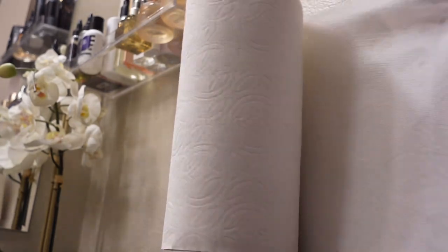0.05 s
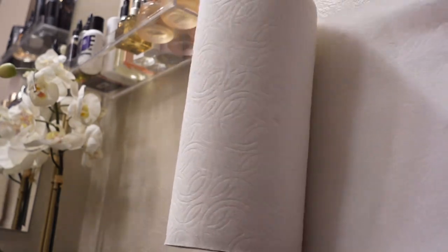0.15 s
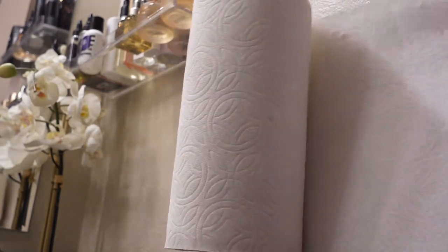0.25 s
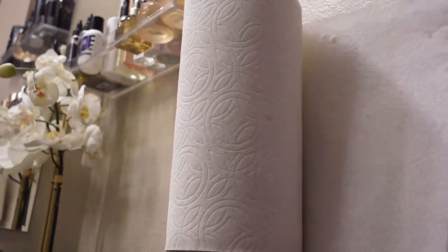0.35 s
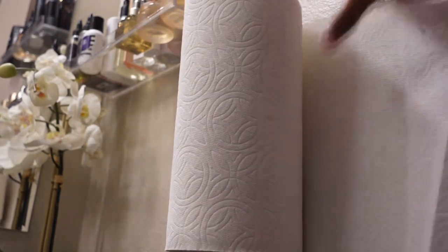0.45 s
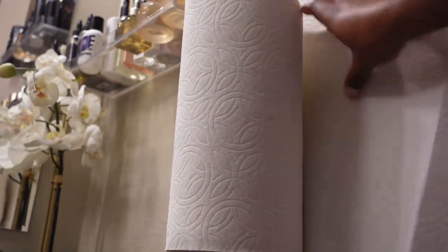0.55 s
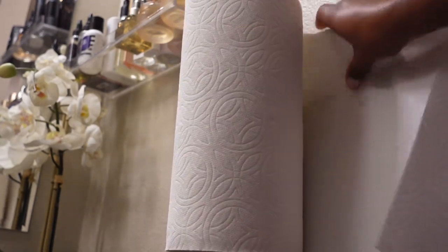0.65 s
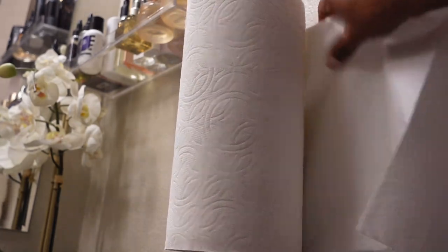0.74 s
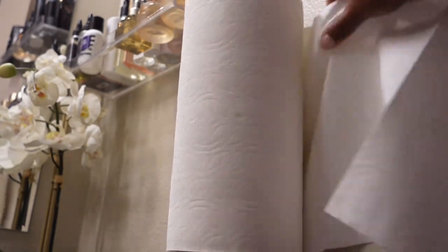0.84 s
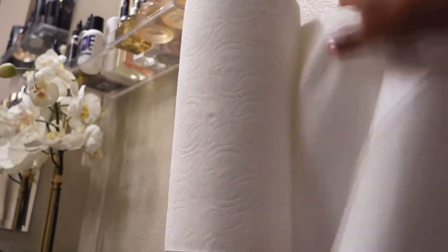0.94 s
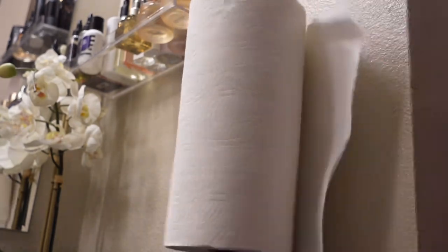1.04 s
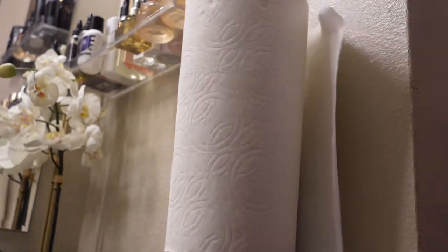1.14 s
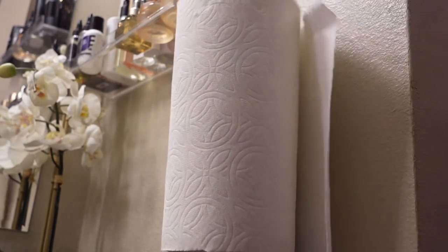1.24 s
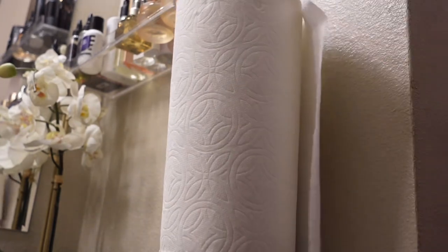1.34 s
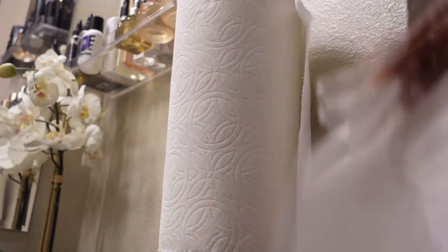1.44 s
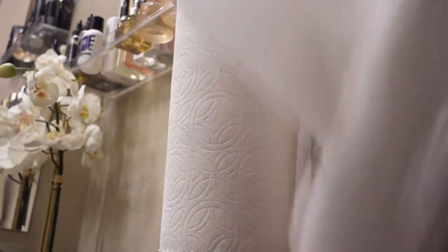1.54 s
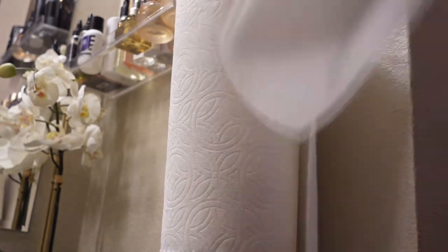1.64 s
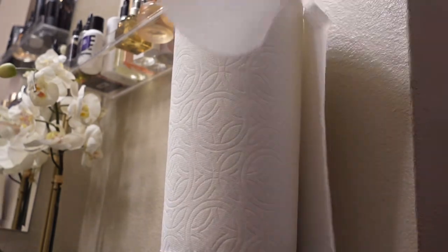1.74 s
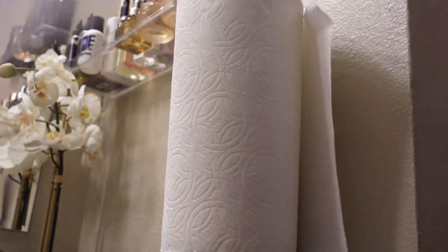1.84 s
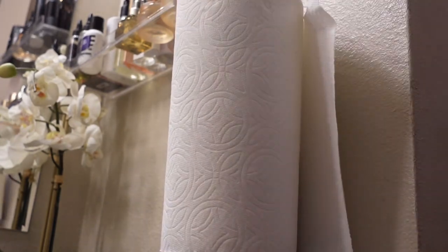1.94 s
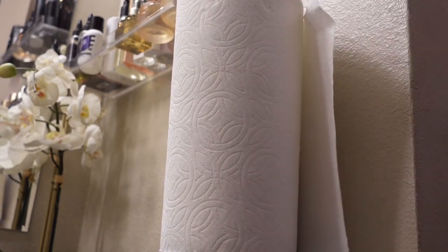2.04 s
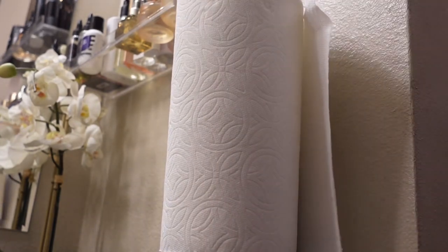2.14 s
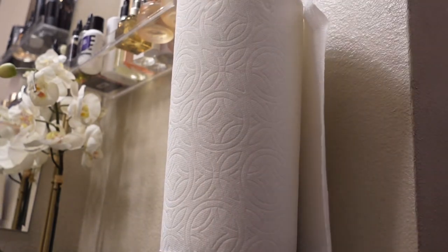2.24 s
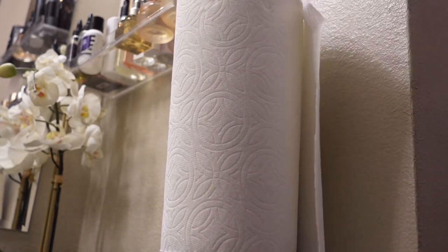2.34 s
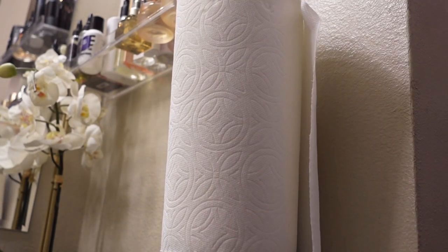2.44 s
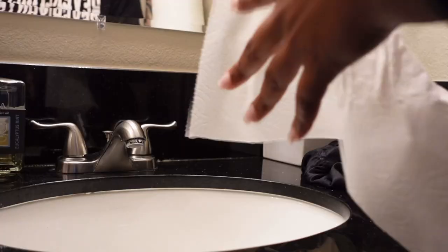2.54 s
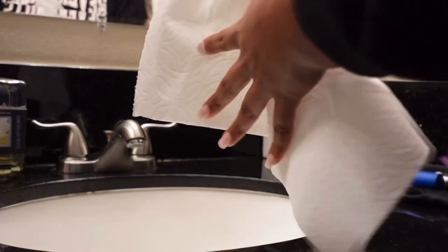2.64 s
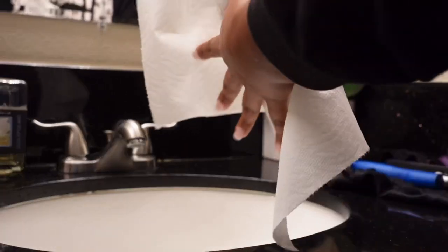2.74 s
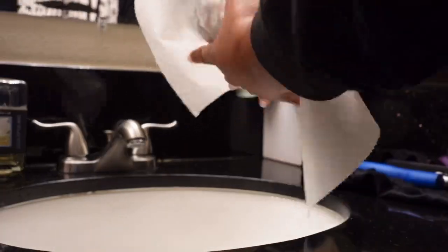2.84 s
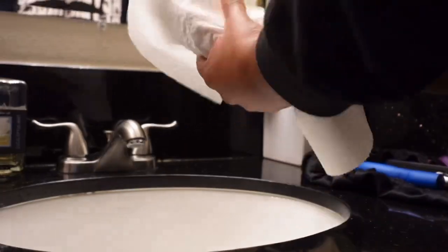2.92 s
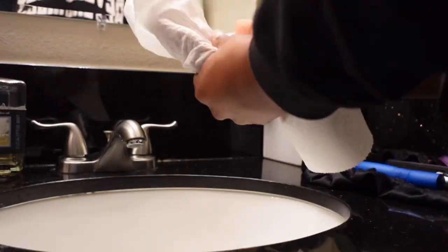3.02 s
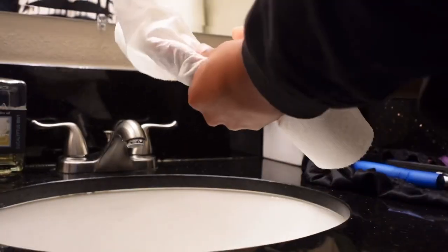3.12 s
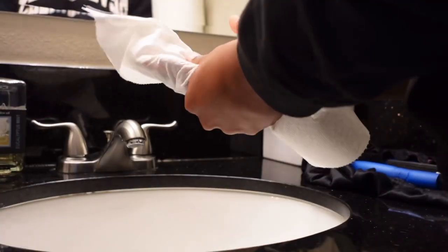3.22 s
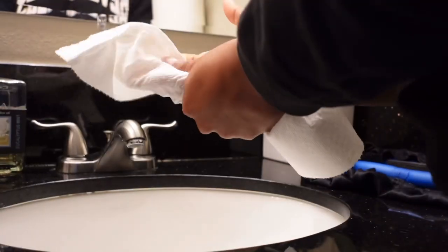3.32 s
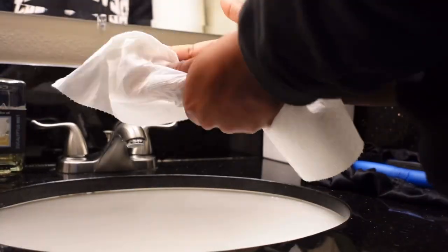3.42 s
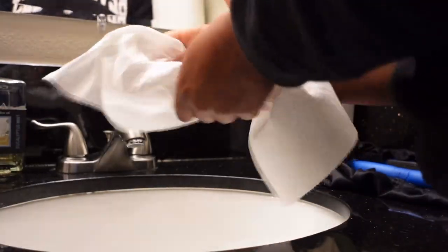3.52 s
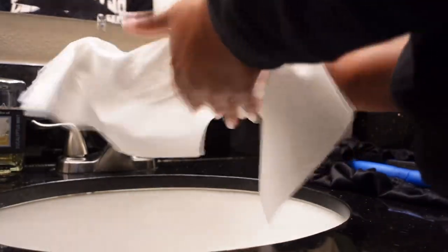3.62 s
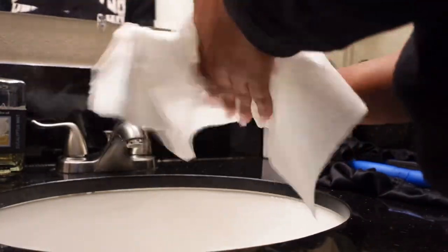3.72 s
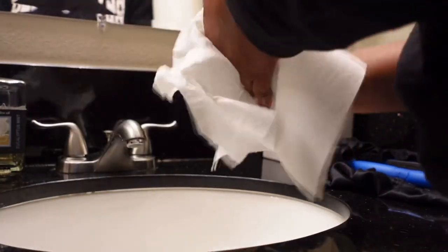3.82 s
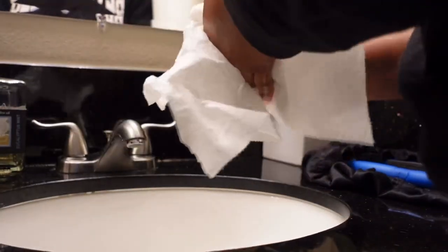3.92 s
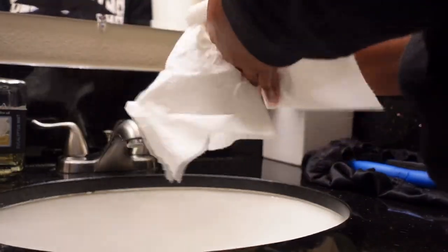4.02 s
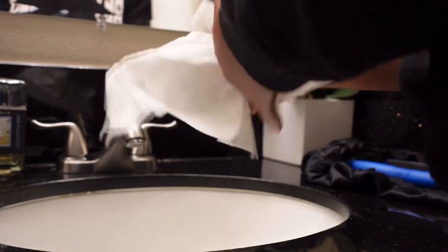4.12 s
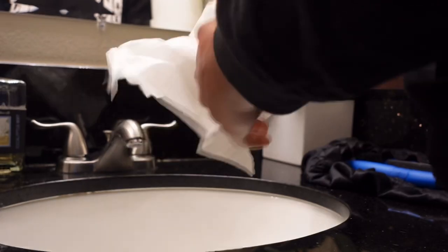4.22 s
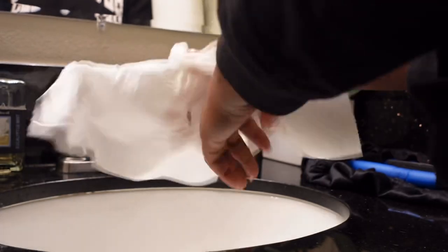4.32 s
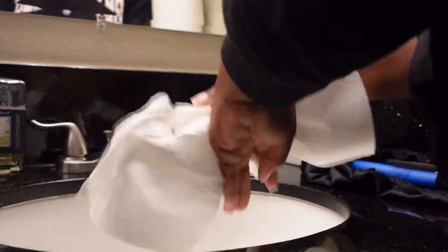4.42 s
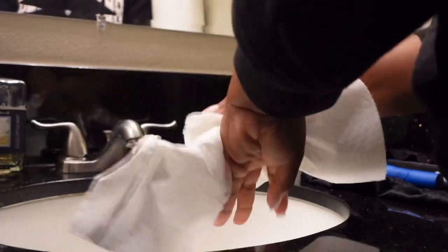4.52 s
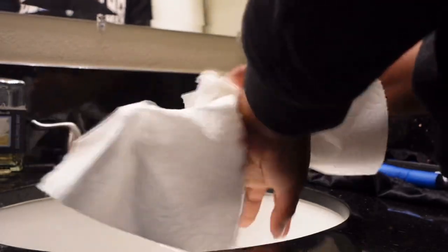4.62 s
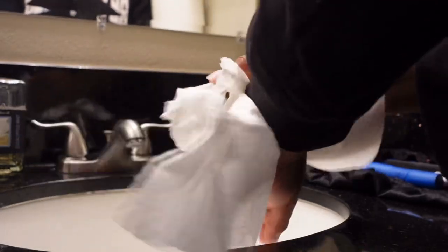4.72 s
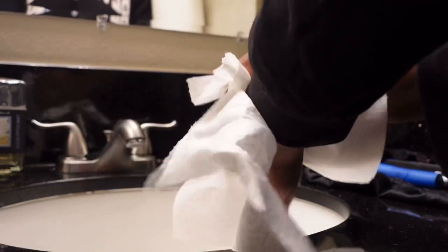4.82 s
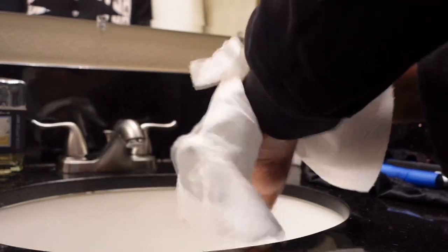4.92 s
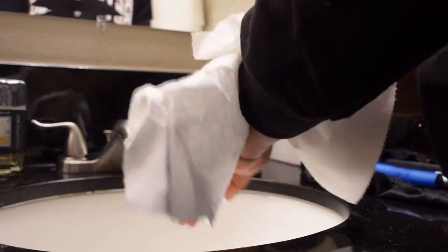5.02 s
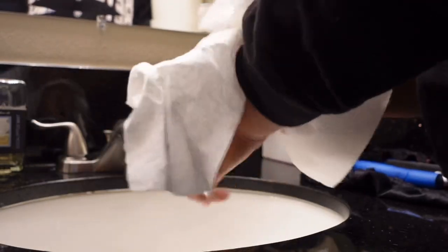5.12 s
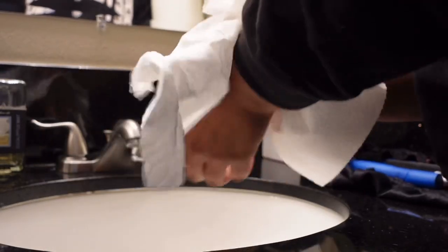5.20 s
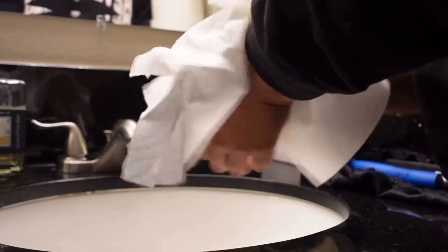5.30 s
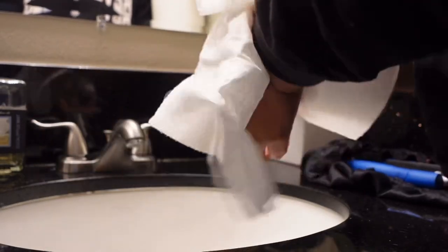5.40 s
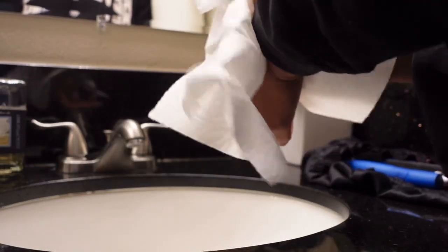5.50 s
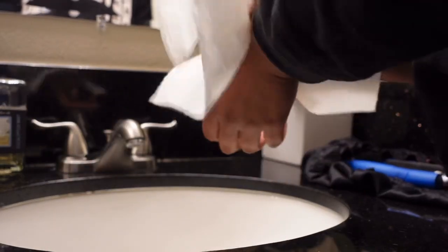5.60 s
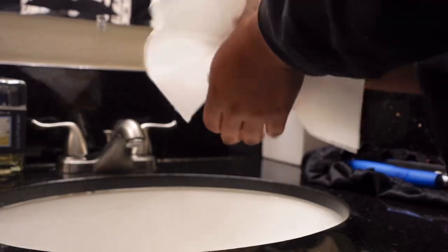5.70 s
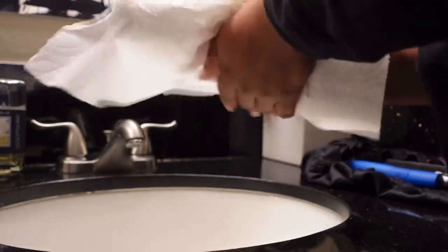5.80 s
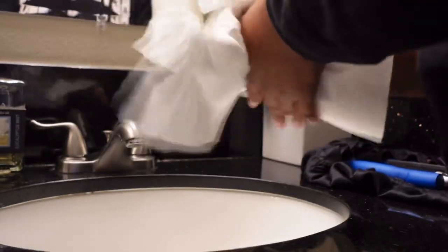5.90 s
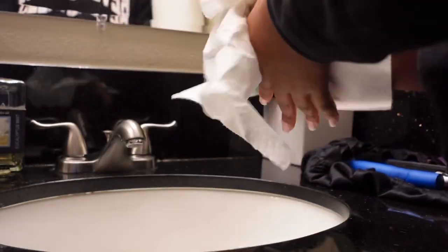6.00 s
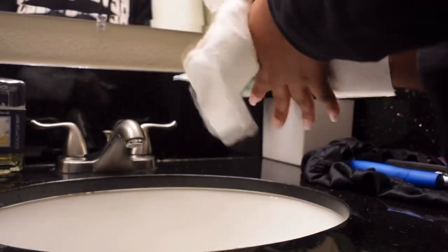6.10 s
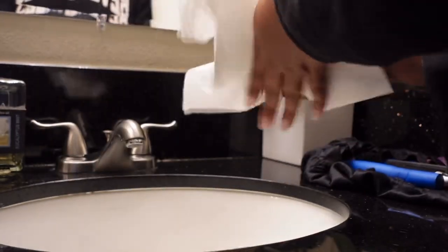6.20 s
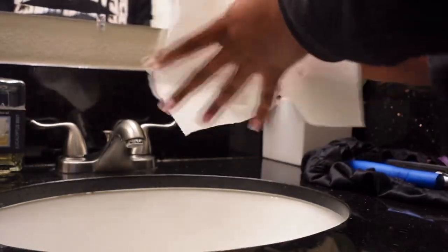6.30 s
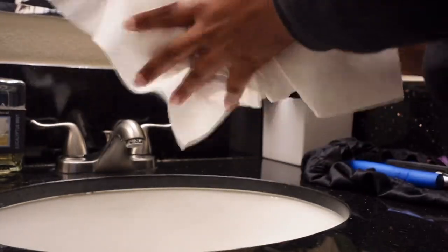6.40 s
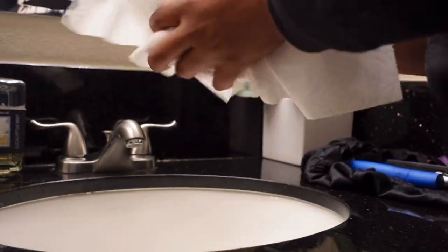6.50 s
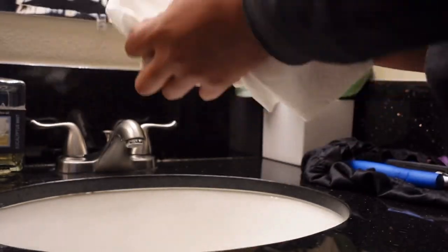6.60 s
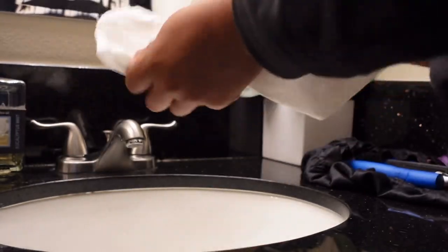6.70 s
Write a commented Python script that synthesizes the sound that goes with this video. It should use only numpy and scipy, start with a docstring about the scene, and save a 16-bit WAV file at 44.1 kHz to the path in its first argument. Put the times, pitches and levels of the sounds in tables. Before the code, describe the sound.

A paper towel is ripped off its roll, then rustles and crinkles softly as hands are dried in a small bathroom.

```python
"""Dry scraping: a paper towel is pulled taut, ripped off its roll at 1 s, then rubbed between wet hands
over a basin in a small bathroom. Each perforation that gives way rings the stretched sheet and sprays
hiss. Fibres scrape in dense grains and crack, creases snap, the sheet slaps and flaps. Something hollow
knocks softly on the right. Tiles add a short dull tail over faint air."""
import sys
import numpy as np
from scipy import signal
from scipy.fft import rfft, irfft
from scipy.io import wavfile
from scipy.ndimage import uniform_filter1d

SR = 44100
rng = np.random.default_rng(int(sys.argv[2]) if len(sys.argv) > 2 else 0)


def transcribe(u):
    """Save the signal u as a 16-bit wav file named by the first command-line argument.

    u: samples, shape (n,) or (channels, n), limited to [-1, 1]; the rate is SR.
    q: integer samples, one column per channel.
    """
    v = np.clip(np.atleast_2d(u).T, -1, 1)
    q = np.round(v * 32767).astype(np.int16)
    wavfile.write(sys.argv[1], SR, q)


N = 297675
T = np.arange(N) / SR
EVENT_N = 12000
SIDE = np.array([[1], [-1]])  # pans are left minus right
DIP_S = 2.556, 2.569

# perforations giving way: t/s, level/dB, hiss/dB, lowest mode/dB, t60/s
PERFORATIONS = [(0.979, -38, -2, 3, 0.11), (1.0006, -23.5, 2, 0.5, 0.12), (1.006, -36, -8.5, 11.5, 0.072),
                (1.022, -27, -2.5, -3.5, 0.16), (1.032, -17.5, -11, 0.5, 0.091),
                (1.039, -17.5, -17.5, -19, 0.09), (1.045, -20.5, -24, -15, 0.017),
                (1.055, -32, -6.5, 5.5, 0.028), (1.065, -42, -7.5, -2, 0.036), (1.072, -36, -4, 3, 0.077),
                (1.083, -37, -5, -5.5, 0.035)]
# stretched sheet: f/Hz, width/Hz, level/dB
TAUT_MODES = [(928, 510, 7.5), (1357, 245, 5), (1540, 490, 4), (1850, 410, 0), (2120, 220, -7)]
# torn edge: f/Hz, level/dB
HISS_SPECTRUM = [(1180, -28), (2000, -7), (2360, -1.5), (5250, -8), (5770, -9.5), (12200, -19.5),
                 (15700, -26)]
# scraping fibres: f/Hz, level/dB
SCRAPE_SPECTRUM = [(350, -14), (600, -7), (707, -9), (1080, -5), (1200, -2), (1740, 2), (1910, 5),
                   (4980, 2.5), (9850, -5.5), (15700, -17.5)]
# hands along the sheet: t/s, length/s, start level/dB, end level/dB, low mids/dB, treble/dB
HAND_STROKES = [(0.0, 0.21, -54, -53.5, -1, 2.5), (0.274, 0.087, -60.5, -60, 3, -1.5),
                (0.492, 0.007, -60, -55.5, -3, -4), (0.562, 0.061, -54, -49, 11, -1.5),
                (0.662, 0.019, -52, -46.5, 11, -3.5), (0.74, 0.056, -46, -45, 12, -4),
                (0.848, 0.21, -47.5, -61.5, 9.5, -1), (1.096, 0.15, -46, -61, 16.5, 5),
                (1.289, 0.031, -58, -49.5, 4, 2), (1.356, 0.16, -50.5, -48.5, 8, -3.5),
                (1.55, 0.074, -56.5, -53.5, 8.5, 0), (1.662, 0.04, -44.5, -47, 2, 4.5),
                (1.743, 0.099, -52, -57, -3, -1.5), (1.89, 0.012, -54, -66, -8, -8),
                (1.933, 0.013, -45, -38, 9.5, 2.5), (1.988, 0.11, -45.5, -44.5, 3.5, 3),
                (2.138, 0.13, -47, -48.5, 8.5, 1.5), (2.285, 0.11, -59.5, -62, -8, 6.5),
                (2.443, 0.13, -68, -60.5, -5, 7), (2.647, 0.11, -52, -60, 12, 0.5),
                (2.79, 0.043, -66, -64, 1.5, 4), (2.907, 0.13, -60, -56, 7.5, 1),
                (3.113, 0.086, -70, -64, 0, 7), (3.256, 0.089, -52.5, -57, 10.5, 1),
                (3.394, 0.057, -58, -59, 4, 2), (3.493, 0.059, -54.5, -47, 5, 0),
                (3.588, .1, -54.5, -50.5, 12.5, -0.5), (3.747, .11, -53.5, -53.5, 12.5, 1),
                (3.888, 0.094, -58, -52, 11, -2), (4.038, 0.14, -53.5, -43.5, 3, -2),
                (4.183, 0.04, -51, -59, 0, 4), (4.289, 0.12, -59, -50, 13.5, -1),
                (4.46, 0.1, -59, -59.5, -1, 0.5), (4.582, 0.12, -44.5, -47.5, 7.5, 3.5),
                (4.952, 0.072, -47, -52.5, 1, 2), (5.055, 0.18, -54.5, -47, -3, 1.5),
                (5.332, 0.12, -58.5, -70.5, 1, -0.5), (5.576, 0.11, -55.5, -49, -8.5, -0.5),
                (5.78, 0.046, -56.5, -53.5, 13.5, -1.5), (5.883, 0.086, -52.5, -51.5, 9, -0.5),
                (6.149, 0.066, -50.5, -45.5, -4, -0.5), (6.299, 0.048, -55.5, -59, 10, -0.5),
                (6.414, 0.012, -39.5, -49.5, 11.5, -5), (6.475, 0.099, -54, -44.5, 5.5, -1.5),
                (6.586, 0.019, -48, -51, 1, 0), (6.692, 0.053, -51, -49.5, -1, 1)]
# hand position: t/s, pan/dB
HAND_PATH = [(0.0, 1), (1.71, -2), (1.88, 2.0), (2.4, 1), (4.27, 2.0), (6.75, 1.5)]
# single fibres cracking: t/s, peak/dB, f/Hz, t60/s
FIBRE_CRACKS = [(1.0012, -14, 1830, 0.041), (1.0332, -15, 1110, 0.044), (1.0366, -10, 1500, 0.037),
                (1.0408, -6.5, 1400, 0.042), (1.0455, -8.5, 1700, 0.044), (1.159, -35, 1710, 0.036),
                (1.3063, -40, 5500, 0.024), (1.315, -40, 3120, .03), (1.6562, -31.5, 2080, 0.0081),
                (1.9284, -43, 1920, .012), (1.96, -33, 2260, .015), (2.042, -30, 4460, 0.0087),
                (2.075, -36, 2000, 0.034), (3.68, -37, 3800, .02), (3.824, -42, 2300, .02),
                (3.9744, -50, 3030, 0.018), (4.1794, -42, 2480, .02), (4.4, -40, 2270, .02),
                (4.689, -36, 2900, 0.016), (5.219, -38, 5080, .02), (6.2298, -35, 2470, 0.017),
                (6.4094, -32.5, 3050, 0.023), (6.5694, -41, 4690, .015)]
# creases snapping: t/s, peak/dB, f/Hz, t60/s, crisp share/dB
CREASE_SNAPS = [(0.6, -40, 1700, 0.05, 5), (0.618, -38, 2520, 0.082, 0), (0.752, -40, 1210, 0.35, 18),
                (0.936, -42.5, 740, 0.027, -18), (1.159, -36.5, 1720, 0.21, 6),
                (1.263, -43.5, 805, 0.095, 5), (1.309, -44, 6500, 0.076, 7), (1.364, -44, 760, 0.1, -1),
                (1.667, -38.5, 2180, 0.13, 9), (1.881, -33, 1880, 0.036, 1), (1.916, -32.5, 2520, 0.08, 7),
                (1.939, -41, 2000, 0.06, -4), (2.378, -48.5, 3430, 0.052, -12.5),
                (2.576, -47.5, 830, 0.06, -18), (3.679, -43, 1250, 0.067, -10),
                (3.747, -45, 1780, 0.067, -17), (3.82, -42, 2300, 0.078, 0), (3.971, -50, 3100, 0.05, -8),
                (4.171, -51, 2450, 0.06, -6), (4.563, -42.5, 1220, 0.3, -4), (5.808, -46, 1670, 0.04, 0),
                (6.134, -51, 2260, 0.084, -12), (6.222, -40, 3500, 0.052, -6), (1.859, -50, 2600, 0.03, 0)]
# sheet hitting roll or palm: t/s, level/dB, f/Hz, t60/s, flapping after/dB
SHEET_SLAPS = [(0.981, -42, 336, 0.061, -39.5), (1.0012, -29, 353, 0.035, -41), (1.038, -41, 386, 0.1, -38),
               (1.162, -40, 358, 0.033, -54), (1.263, -45, 390, 0.037, -53),
               (1.362, -45.5, 395, 0.082, -54), (1.915, -40, 366, 0.14, -53), (1.926, -43, 320, 0.054, -54),
               (1.955, -44, 335, 0.049, -61), (2.571, -56.5, 225, 0.18, -65), (2.669, -49, 168, 0.041, -62),
               (3.672, -51, 235, 0.41, -57), (3.819, -54, 224, 0.08, -73), (4.405, -48.5, 185, 0.19, -74),
               (5.818, -48, 246, 0.073, -64), (5.834, -48.5, 297, 0.07, -72), (5.863, -49, 260, 0.055, -64),
               (6.384, -50, 200, 0.061, -60), (6.395, -36.5, 226.4, 0.14, -55)]
# loose sheet: f/Hz, width/Hz, level/dB
FLAP_MODES = [(147.5, 125, -1.5), (209.3, 105, -5), (296, 313, -1), (62.4, 85, -7.5)]
# loose sheet swinging: t/s, level/dB
FLAP_LEVELS = [(0.0, -64), (0.45, -81), (0.6, -59), (1.4, -64), (1.85, -64), (2.1, -56), (2.5, -70),
               (2.8, -59.5), (3.2, -60.5), (3.6, -62.5), (4.14, -63), (4.25, -62.5), (4.5, -60),
               (4.81, -69), (4.95, -64), (5.75, -67), (6.0, -65), (6.75, -68.5)]
# stiff sheet and cardboard core: t/s, level/dB, f/Hz, rise/s, t60/s
STIFF_RINGS = [(0.478, -48, 4720, .012, 0.052), (0.482, -53, 2190, 0.0042, 0.047),
               (0.482, -57, 6100, .005, 0.068), (0.585, -46, 1169, 0.011, 0.042),
               (0.615, -44, 771, 0.0027, 0.23), (0.616, -53, 2310, .004, 0.065),
               (0.748, -52, 1214, 0.0055, 0.13), (0.75, -49.5, 2260, .005, 0.077),
               (5.664, -54.5, 2037, 0.0095, 0.16), (5.807, -49, 1660, .003, 0.036)]
# knocks: t/s, level/dB, upper mode/dB
HOLLOW_KNOCKS = [(2.652, -51.5, 5), (2.679, -46, -5), (2.719, -48.5, -8), (2.731, -51, 0),
                 (2.742, -47.5, -1.5), (2.752, -49, -2), (2.769, -52, 1), (3.612, -57, 5), (3.662, -54, -3),
                 (3.712, -53, 1), (3.725, -55.5, 11.5), (3.782, -57, 7), (3.927, -57.5, 2),
                 (3.943, -50.5, 5.5), (3.968, -48.5, -2), (4.045, -57.5, 3.5), (4.197, -51, -11),
                 (4.299, -49, -6), (4.35, -51, 1), (4.566, -56, -1), (4.764, -55.5, 2), (4.802, -47.5, -10),
                 (4.833, -51, 0.5), (5.198, -53, 0), (5.233, -54.5, 1.5), (5.551, -53, -3.5),
                 (5.682, -55, 1.5), (5.897, -49.5, -22), (5.965, -51, 3), (6.032, -52.5, 0.5),
                 (6.043, -50, -0.5)]
# hollow body: f/Hz, t60/s
HOLLOW_MODES = [(475, 0.11), (560, 0.041)]
# room air: f/Hz, level/dB
AIR_SPECTRUM = [(18, -52), (30, -30), (75, -13), (127, -1), (219, 0), (732, -3), (1560, -3.5),
                (2300, -1.5), (3300, -9), (7930, -22.5), (14500, -19.5), (15700, -23)]


def tearing():
    """The strain and each rip drive the stretched sheet's modes and spray fibre hiss."""
    rips = [(s, db, hiss_db, low_db, swell(0.00059, t60))
            for s, db, hiss_db, low_db, t60 in PERFORATIONS]
    lead_s, rise_db_per_s, t60_s = 0.08, 505, 0.32
    t = T[:16000] - lead_s
    strain = undb(np.minimum(rise_db_per_s * t, -60 * t / t60_s))
    rips.append((1 - lead_s, -37, 7.5, 0, strain))
    upper_drive, low_drive, spray = np.zeros((3, 2, N))
    for s, db, hiss_db, low_db, shape in rips:
        add(upper_drive, s, undb(db) * shape)
        add(low_drive, s, undb(db + low_db) * shape)
        add(spray, s, undb(db + hiss_db) * shape)
    crackle = grains(rate_hz=700, spread_db=2.2)
    lowest, *upper = (undb(db) * band(crackle, hz, width, width) for hz, width, db in TAUT_MODES)
    ring = (low_drive * lowest + upper_drive * sum(upper)) / np.std(lowest + sum(upper))
    edge = colour(rng.standard_normal(N), HISS_SPECTRUM)  # hiss from all along the torn edge
    hiss = colour(crackle, HISS_SPECTRUM) + undb(-32.5) * edge * SIDE
    return ring * undb(-0.8 * SIDE) + spray * hiss


def scraping():
    """Hands scrape the fibres: grainy noise, flickering in half-octave bands."""
    fibres = colour(grains(rate_hz=590, spread_db=1.25), SCRAPE_SPECTRUM)
    spectrum = rfft(folds(fibres, t60_s=0.03, depth_db=-7))
    octave = np.log2(np.arange(len(spectrum)) * SR / N + 1)
    out = 0
    for hz in 350 * 2 ** (np.arange(13) / 2):
        low = np.clip(np.log2(2000 / hz), 0, 1)
        treble = np.clip(2 * np.log2(hz / 4500), 0, 1)
        patch = irfft(spectrum * np.clip(1 - 2 * abs(octave - np.log2(hz)), 0, 1), N)
        thin_db = -9.5 * (hz < 800) * (T > DIP_S[0])  # from the dip on, the scraping has less body below 800 Hz
        out = out + patch * strokes(low, treble) * undb(0.6 * walk(rate_hz=50) + thin_db)
    out = out * undb(0.11 * walk(rate_hz=35))
    spread = signal.fftconvolve(out, rng.standard_normal(200) / np.sqrt(200))[:N]
    return out + undb(-42) * spread * SIDE


def strokes(low, treble):
    """Gain of a band with these low-mid and treble shares: each stroke rises, glides and lets go."""
    rise_db_per_s, fall_db_per_s, brighten_db_per_db = 420, 288, 0.16
    t = T[::100]
    power = undb(2 * (-75 + 17 * low + 11.5 * treble))  # sheet at rest in the hands
    for s, length, start_db, end_db, low_db, treble_db in HAND_STROKES:
        edge_db = rise_db_per_s * np.minimum(t - s, 0) - fall_db_per_s * np.maximum(t - s - length, 0)
        db = np.interp(t, [s, s + length], [start_db, end_db]) + edge_db
        bright_db = treble_db + brighten_db_per_db * (db - max(start_db, end_db))
        power = power + undb(2 * (db + low * low_db + treble * bright_db))
    return np.interp(T, t, np.sqrt(power))


def folds(x, t60_s, depth_db, size=4096):
    """The crumpled sheet rings briefly in many narrow modes, new ones each time it refolds."""
    out = np.zeros(N + 2 * size)
    hop = size // 2
    for i in range(0, N, hop):
        piece = x[i:i + size] * np.sqrt(np.hanning(size))[:N - i]
        response = unit(rng.standard_normal(hop) * swell(0.00025, t60_s, hop))
        ring = signal.fftconvolve(piece, response)
        out[i:i + len(ring)] += ring
    return unit(x + undb(depth_db) * unit(out[:N]))


def cracks():
    """Single fibres break with a sharp tick."""
    out = np.zeros((2, N))
    for s, db, hz, t60 in FIBRE_CRACKS:
        burst = rng.standard_normal(1000) * swell(0.00017, t60, 1000)
        tick = band(burst, hz, 0.56 * hz, 2.2 * hz)
        add(out, s, undb(db) * tick / abs(tick).max(), pan_db=0.7)
    return out


def creases(rise_s=0.005):
    """Creases snap: a narrow noise burst plus a broad crisp one."""
    out = np.zeros((2, N))
    for s, db, hz, t60, crisp_db in CREASE_SNAPS:
        noise = rng.standard_normal(EVENT_N)
        body = unit(band(noise, hz, 0.29 * hz, 0.32 * hz))
        crisp = unit(band(band(noise, 2400, 3600), 2300, 8300))
        snap = (body + undb(crisp_db) * crisp) * swell(rise_s, t60)
        add(out, s - rise_s, undb(db) * snap / abs(snap).max(), pan_db=0.8)
    return out


def slaps():
    """The sheet hits roll or palm with a dull, noisy tone."""
    out = np.zeros((2, N))
    for s, db, hz, t60, _ in SHEET_SLAPS:
        tone = sine(hz) + 0.9 * roughness(hz, 1.6 * hz, 1.4 * hz)
        add(out, s, undb(db) * unit(tone) * swell(0.0012, t60), pan_db=1.5)
    return out


def flapping():
    """The loose sheet swings in low modes, harder after each slap; its two ends flap apart."""
    drives = [grains(rate_hz=46, spread_db=1.5) for _ in range(2)]
    mid, side = (unit(sum(undb(db) * band(x, hz, w, w) / np.sqrt(w) for hz, w, db in FLAP_MODES))
                 for x in drives)
    swing = np.ones((2, 1)) * undb(curve(FLAP_LEVELS))
    for s, *_, flap_db in SHEET_SLAPS:
        add(swing, s, undb(flap_db) * swell(rise_s=0.0022, t60_s=0.27))
    return (mid + undb(-11.5) * side * SIDE) * swing


def rings():
    """The stiff sheet and cardboard core ring briefly at a rough pitch."""
    out = np.zeros((2, N))
    for s, db, hz, rise, t60 in STIFF_RINGS:
        tone = sine(hz) + 0.68 * roughness(hz, 0.12 * hz)
        add(out, s, undb(db) * tone * swell(rise, t60), pan_db=0.6)
    return out


def knocks(detune=0.016, rough=0.37):
    """Something hollow rings in two close modes, tuned a little differently at each knock."""
    out = np.zeros((2, N))
    for s, db, upper_db in HOLLOW_KNOCKS:
        phases = 2 * np.pi * rng.random(2)
        tune = 1 + detune * rng.standard_normal()
        for (hz, t60), mode_db, phase in zip(HOLLOW_MODES, (0, upper_db), phases):
            tone = sine(hz * tune, phase) + rough * roughness(hz, 0.17 * hz)
            tone /= np.sqrt(1 + 2 * rough ** 2)
            add(out, s, undb(db + mode_db) * tone * swell(0.0015, t60), pan_db=-11)
    return out


def room(x, centre_hz=766):
    """Tiled walls: a short dull tail, different in each ear."""
    tail = rng.standard_normal((2, EVENT_N)) * swell(rise_s=0.00067, t60_s=0.14)
    tail = band(tail, centre_hz, 2 * centre_hz, 2.2 * centre_hz)
    tail /= np.sqrt(np.sum(tail ** 2, axis=1, keepdims=True))
    return signal.fftconvolve(x.mean(axis=0)[None], tail, axes=1)[:, :N]


def air():
    """Steady room air; the treble arrives alike on both sides."""
    mid, side = (colour(rng.standard_normal(N), AIR_SPECTRUM) for _ in range(2))
    return mid + undb(-2.5) * band(side, 300, 1960) * SIDE


def undb(db):
    return 10 ** (np.asarray(db) / 20)


def unit(x):
    return x / np.sqrt(np.mean(x ** 2))


def curve(points):
    return np.interp(T, *np.transpose(points))


def sine(hz, phase=0):
    return np.sin(2 * np.pi * hz * T[:EVENT_N] + phase)


def band(x, hz, *widths_hz):
    """Resonances in series, one per width; gain 1 at the centre."""
    for width in widths_hz:
        x = signal.lfilter(*signal.iirpeak(hz, hz / width, fs=SR), x)
    return x


def roughness(hz, *widths_hz):
    """Noise around a pitch; rms 1."""
    return unit(band(rng.standard_normal(EVENT_N), hz, *widths_hz))


def colour(x, points):
    """Shape a spectrum by (f/Hz, level/dB) points; rms 1."""
    hz, db = np.transpose(points)
    f = np.arange(len(x) // 2 + 1) * SR / len(x) + 1
    gain = undb(np.interp(np.log(f), np.log(hz), db, left=-80, right=-80))
    return unit(irfft(rfft(x) * gain, len(x)))


def walk(rate_hz):
    """Random steps, smoothed twice."""
    hold = int(SR / rate_hz)
    steps = np.repeat(rng.standard_normal(N // hold + 1), hold)
    return uniform_filter1d(uniform_filter1d(steps, hold), hold)[:N]


def grains(rate_hz, spread_db):
    """Noise whose level varies from grain to grain; rms 1."""
    return unit(rng.standard_normal(N) * undb(spread_db * walk(rate_hz)))


def swell(rise_s, t60_s, count=EVENT_N):
    """Rise and decay; peak 1."""
    t = T[:count]
    envelope = (1 - np.exp(-t / rise_s)) ** 2 * 1000. ** (-t / t60_s)
    return envelope / envelope.max()


def add(out, s, x, pan_db=0.):
    """Mix x in at time s."""
    i = int(s * SR)
    out[:, i:i + len(x)] += x[:N - i] * undb(SIDE * pan_db / 2)


def scene():
    """Towel and knocks, their echo, and room air."""
    direct = creases() + rings() + cracks() + slaps() + knocks()
    direct += (scraping() + flapping()) * undb(SIDE * curve(HAND_PATH) / 2)
    direct += tearing()
    return direct + undb(-21) * room(direct) + undb(-61) * air()


def record(dry, low_hz=63.6, top_hz=15650):
    """The level dips briefly; the microphone loses the deep bass and the top is cut steeply."""
    start, end = DIP_S
    gain = np.interp(T, [start - 0.002, start, end, end + 0.0066], [0.8, 0.19, 0.14, 0.85])
    thin = signal.sosfilt(signal.butter(4, low_hz, "high", fs=SR, output="sos"), dry * gain)
    return signal.sosfilt(signal.ellip(10, 0.2, 75, top_hz, fs=SR, output="sos"), thin)


dry = scene()
out = record(dry)
transcribe(out)
```